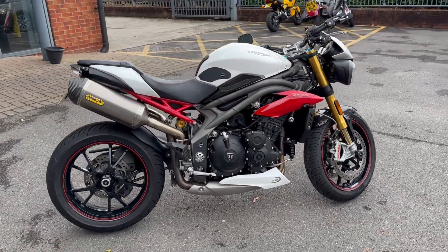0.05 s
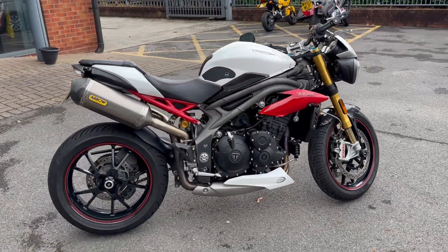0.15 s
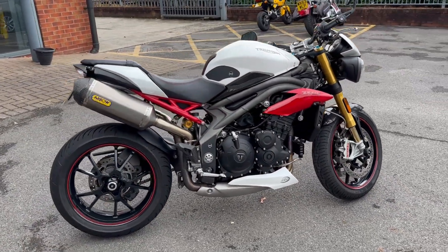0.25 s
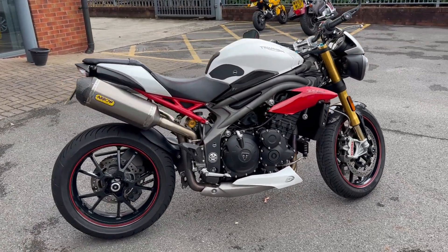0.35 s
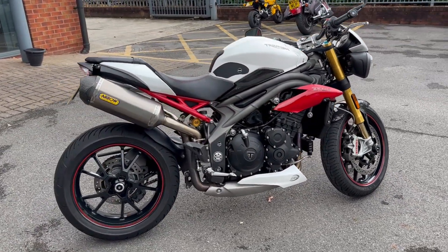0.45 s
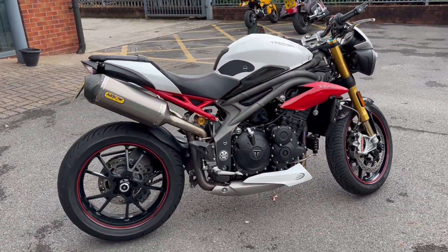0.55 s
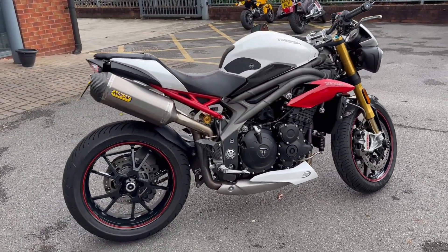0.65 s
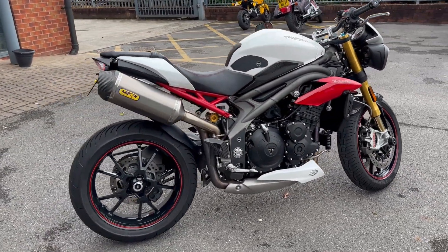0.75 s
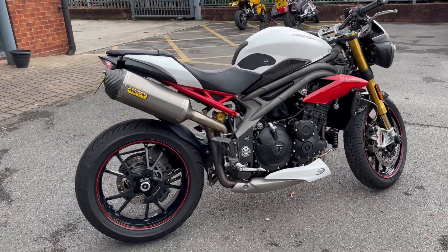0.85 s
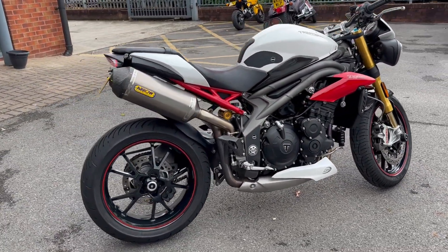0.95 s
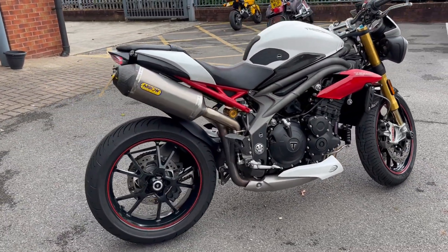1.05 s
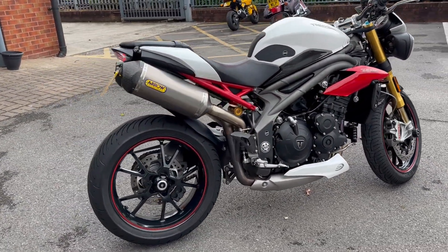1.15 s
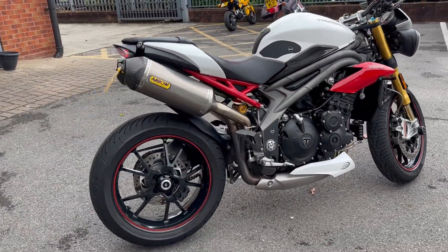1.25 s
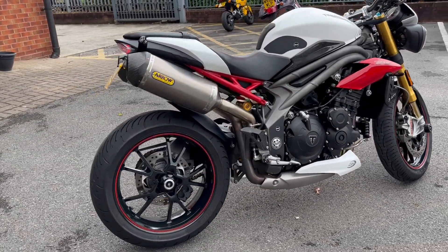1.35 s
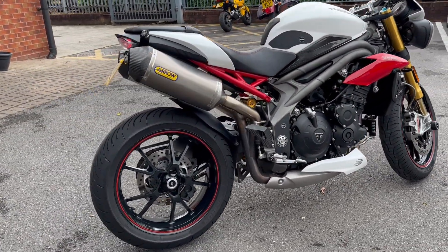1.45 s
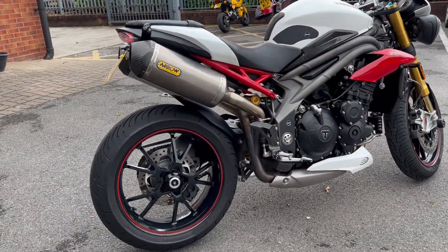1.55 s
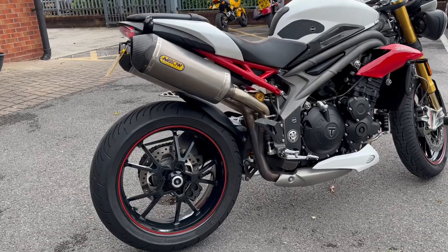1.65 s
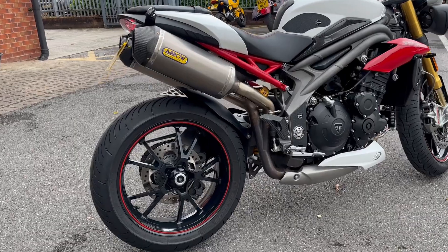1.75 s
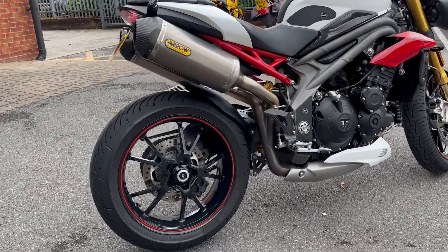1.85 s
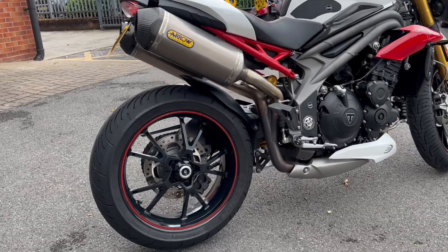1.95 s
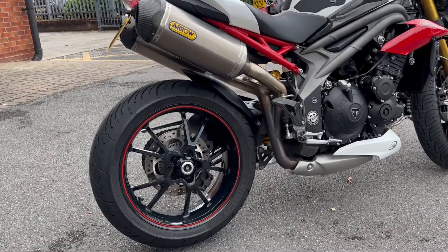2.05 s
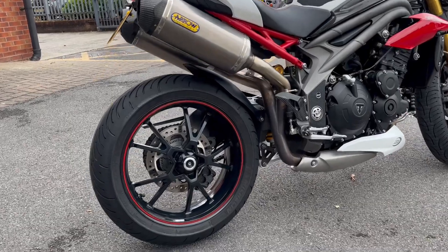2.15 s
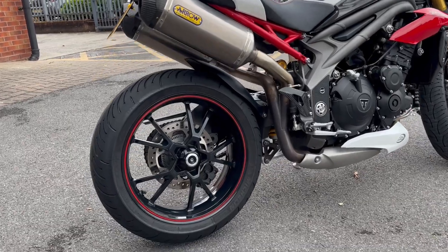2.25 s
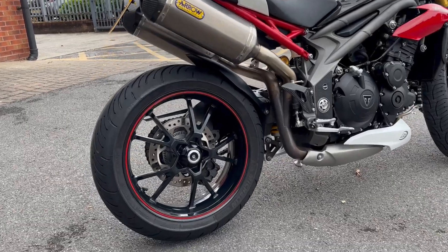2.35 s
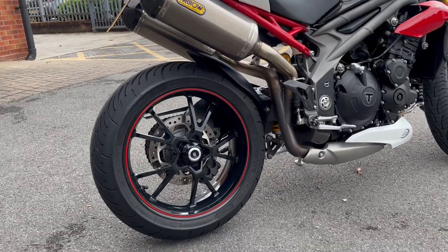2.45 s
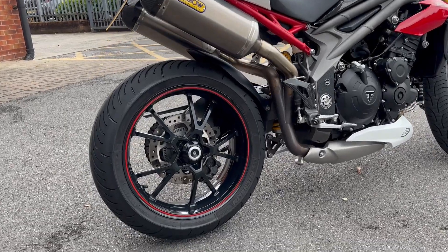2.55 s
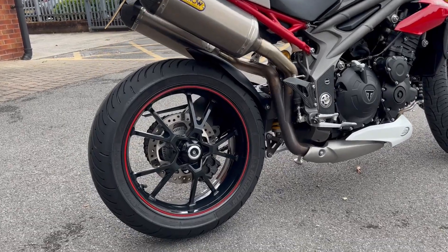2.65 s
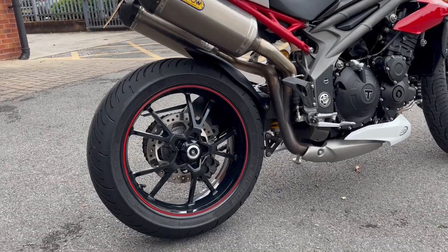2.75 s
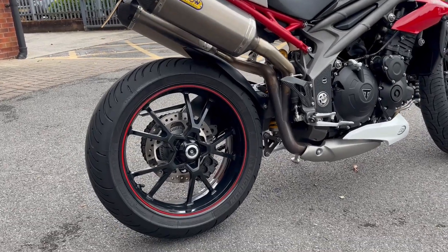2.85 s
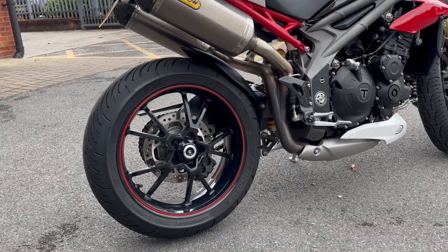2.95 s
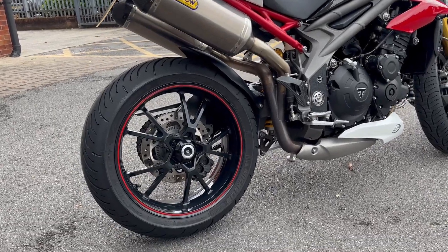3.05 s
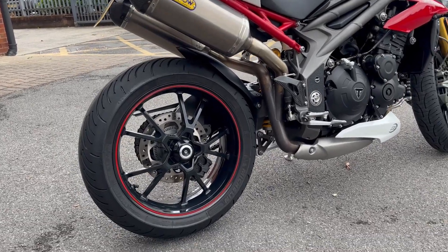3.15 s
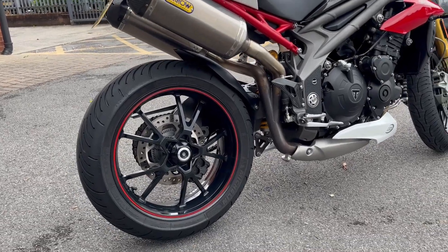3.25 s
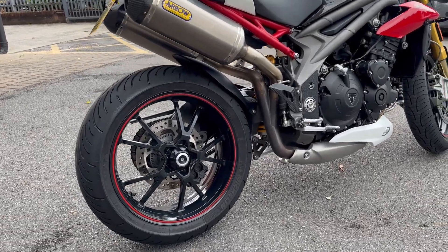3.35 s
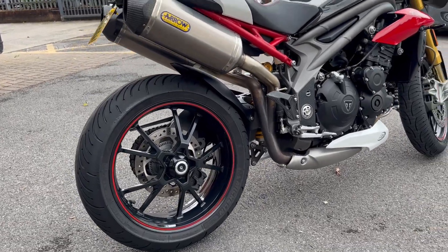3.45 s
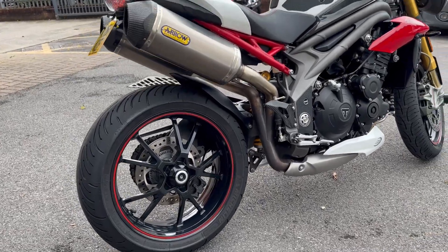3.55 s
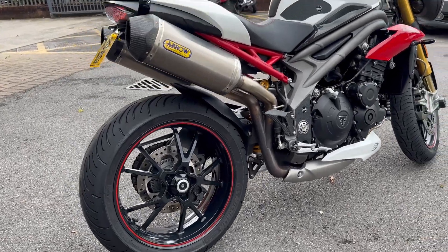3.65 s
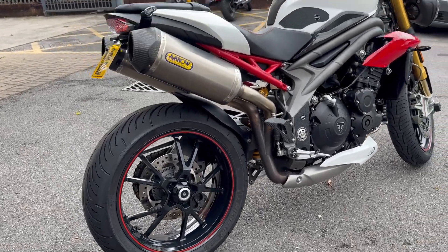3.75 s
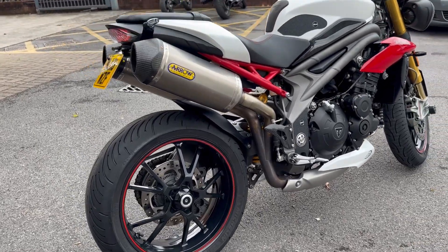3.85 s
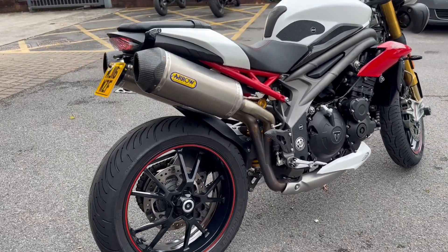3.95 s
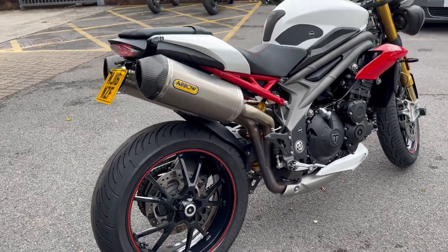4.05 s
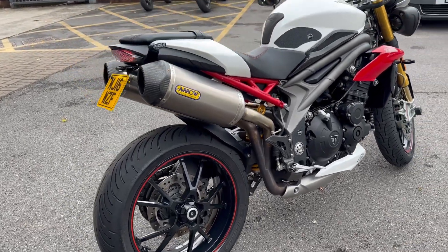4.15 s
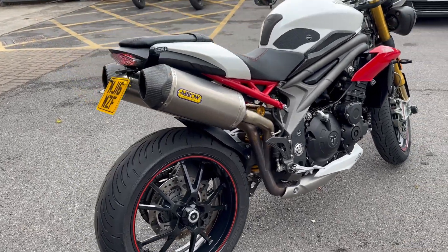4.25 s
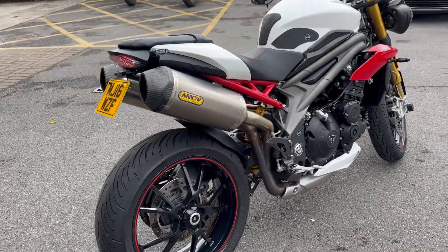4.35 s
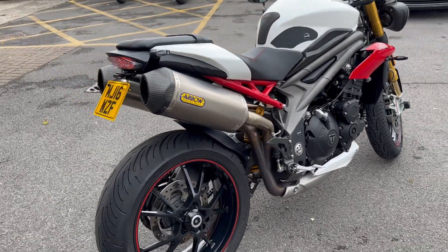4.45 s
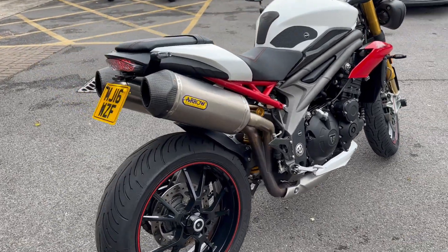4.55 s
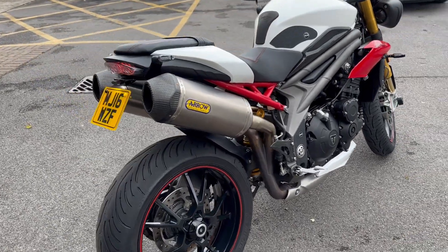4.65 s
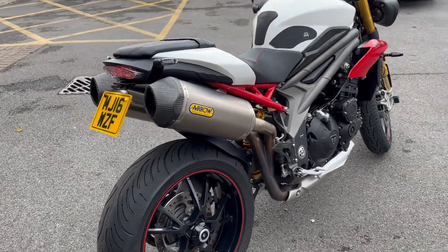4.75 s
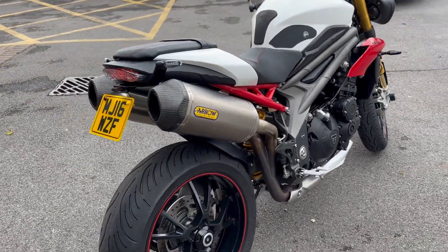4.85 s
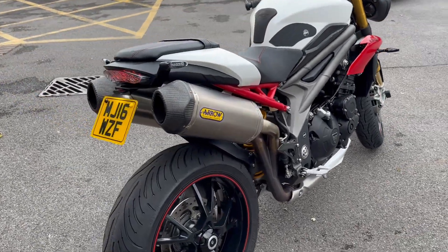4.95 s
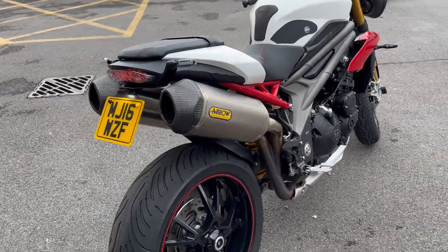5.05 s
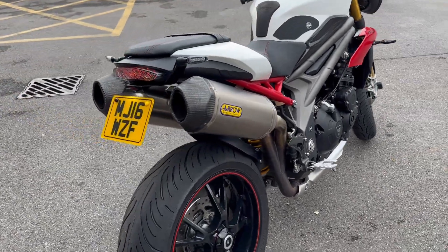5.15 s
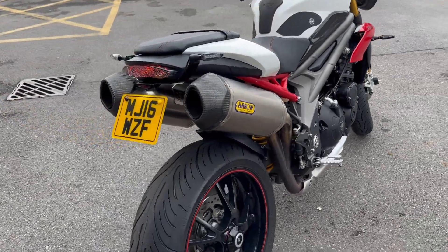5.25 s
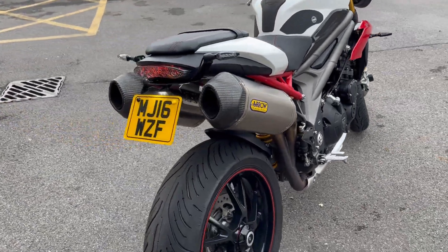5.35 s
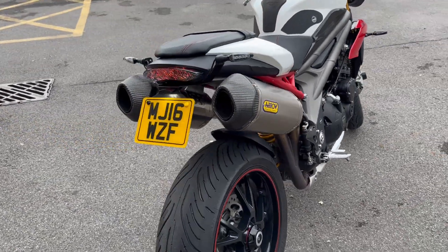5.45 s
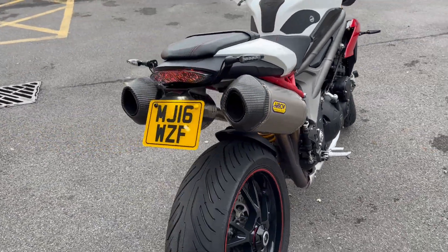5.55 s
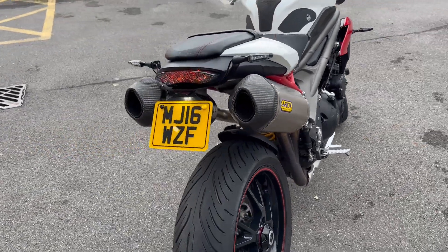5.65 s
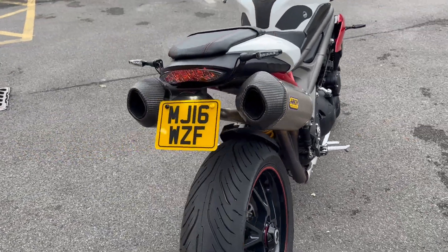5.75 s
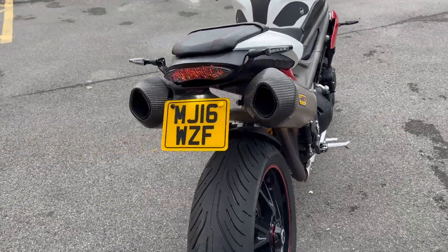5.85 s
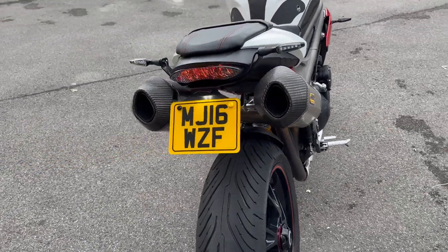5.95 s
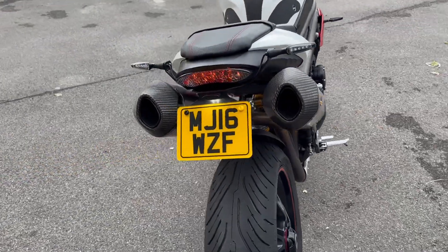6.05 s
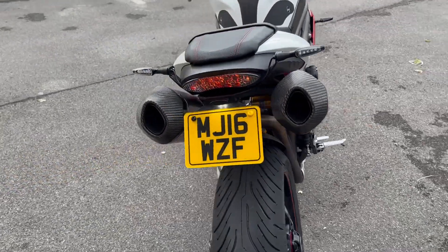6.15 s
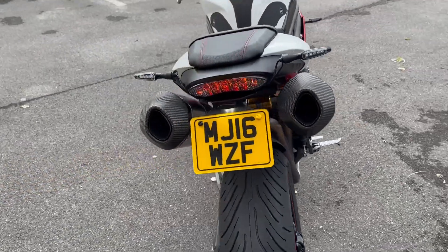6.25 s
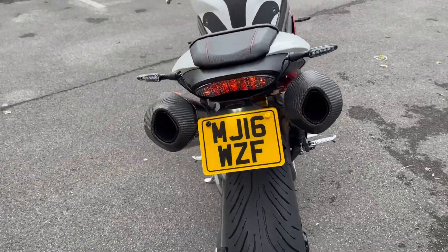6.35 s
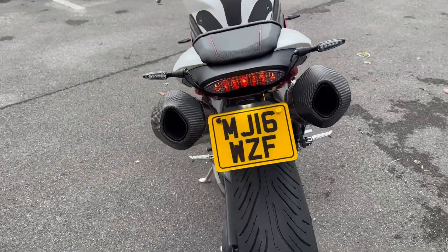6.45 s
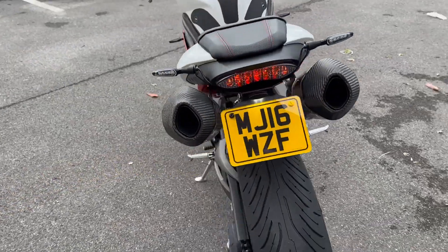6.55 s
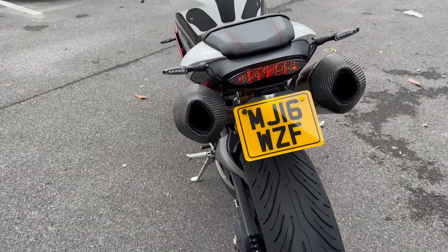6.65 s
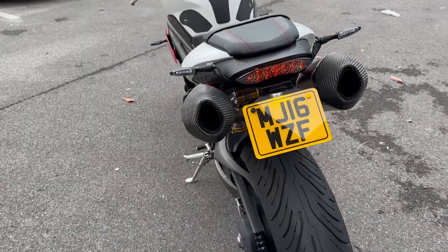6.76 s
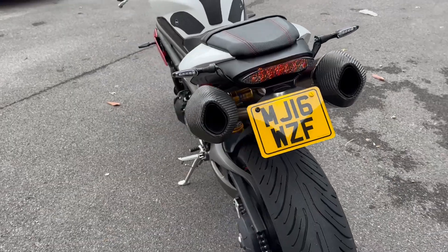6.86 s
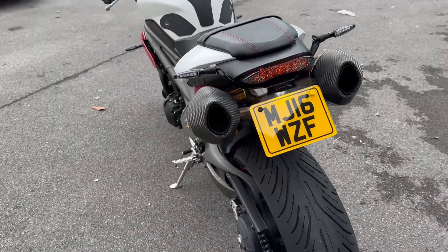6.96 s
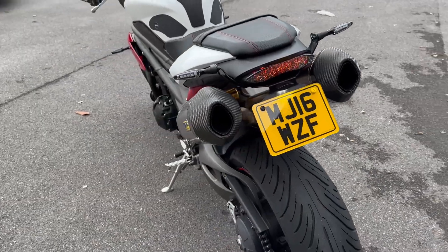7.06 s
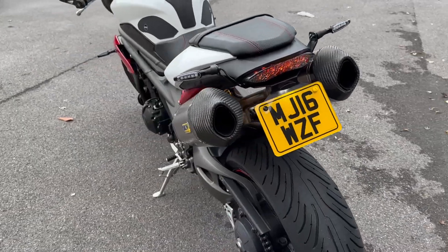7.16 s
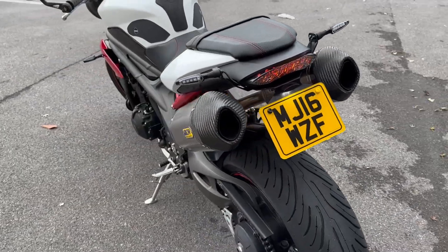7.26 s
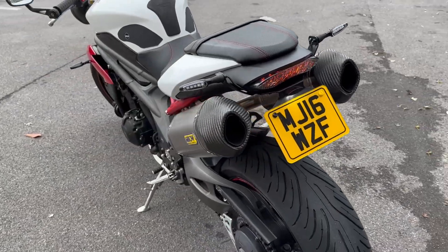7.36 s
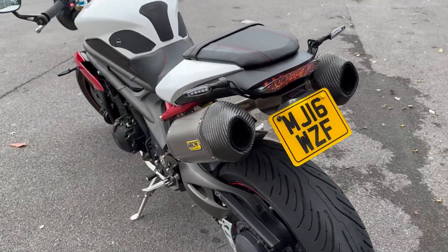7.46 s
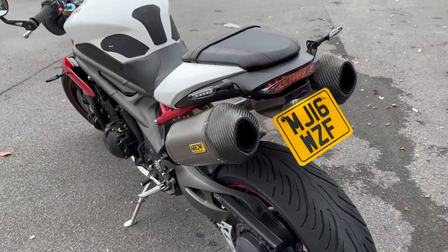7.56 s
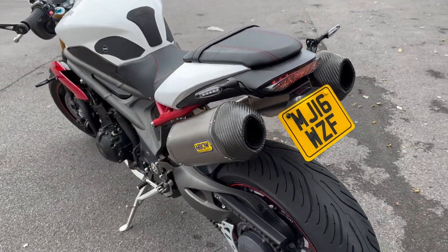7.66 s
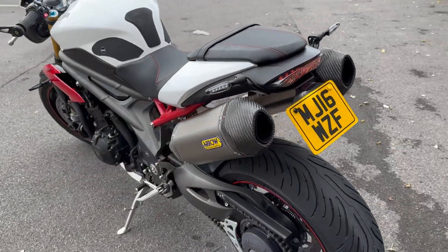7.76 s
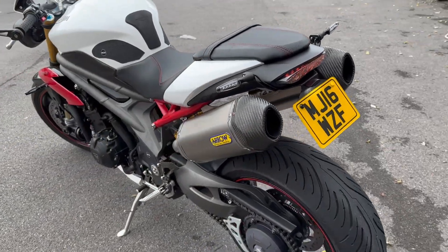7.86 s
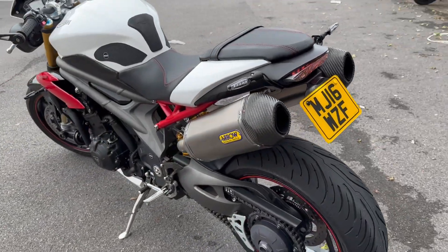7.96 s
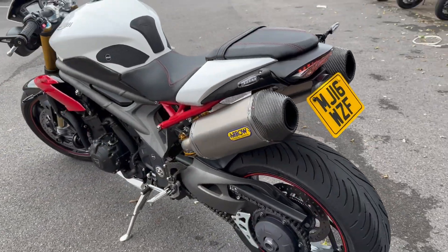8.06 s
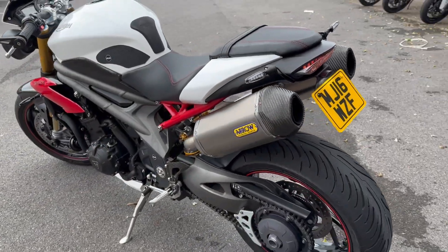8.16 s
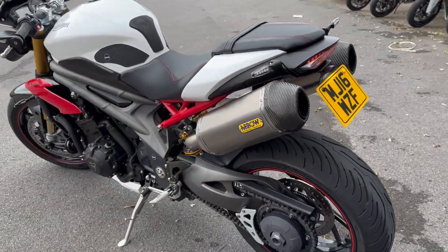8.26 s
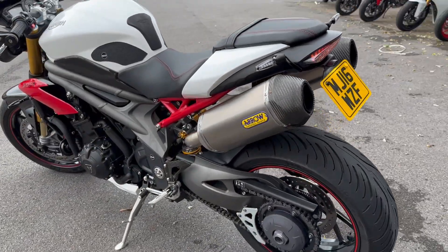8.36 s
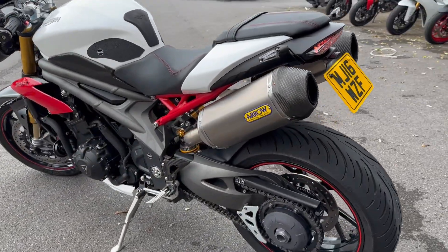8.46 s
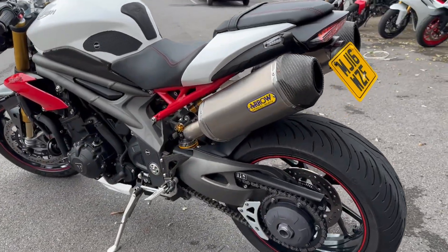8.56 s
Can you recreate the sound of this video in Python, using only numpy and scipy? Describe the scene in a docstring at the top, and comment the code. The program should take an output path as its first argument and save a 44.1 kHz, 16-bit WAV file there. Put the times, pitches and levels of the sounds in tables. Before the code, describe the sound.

A three-cylinder motorcycle idles without revving on an open paved forecourt. A handheld stereo microphone starts a few metres off its right side, hearing a low boom, fast gear chirps, ticking valves and whirring chain. It moves close, then swings behind, where twin tailpipes bark and puff loudest, and ends on the left with the bark easing. Short scattered reflections surround it.

```python
"""A three-cylinder motorcycle idles on an open forecourt; a phone carried along hears its right side first, then its tail, then its left.
On the right the primary gear chirps, as the crank slows and surges with every firing, and injectors and valves tick
over the whirr of the chain. Behind the bike the twin tailpipes beam a bark and puffs of gas; round on the left these ease.
Throughout, every firing rings the exhaust pipes into a boom, and the forecourt returns a short scatter."""
import sys
import numpy as np
from scipy import signal
from scipy.fft import rfft, irfft, next_fast_len
from scipy.io import wavfile
from scipy.ndimage import uniform_filter1d, minimum_filter1d

SR = 44100
rng = np.random.default_rng(int(sys.argv[2]) if len(sys.argv) > 2 else 0)


def transcribe(u):
    """Save the signal u as a 16-bit wav file named by the first command-line argument.

    u: samples, shape (n,) or (channels, n), limited to [-1, 1]; the rate is SR.
    q: integer samples, one column per channel.
    """
    v = np.clip(np.atleast_2d(u).T, -1, 1)
    q = np.round(v * 32767).astype(np.int16)
    wavfile.write(sys.argv[1], SR, q)


N = 379260
TIME = np.arange(N) / SR  # s

# idle speed, wandering with sudden dips: t/s, firing rate/Hz
IDLE_SPEED = [(0.0, 32.74), (0.28, 32.18), (1.14, 33.27), (1.94, 32.3), (2.24, 33.86), (2.35, 31.69),
              (2.93, 33.11), (3.13, 32.04), (3.5, 32.88), (4.11, 32.3), (4.26, 33.58), (4.89, 32.53),
              (5.57, 33.58), (5.77, 30.91), (5.78, 32.73), (7.19, 32.75), (7.31, 30.95), (7.63, 33.58),
              (8.18, 33.19), (8.6, 31.67)]
# walk round the bike: t/s, distance from the tailpipes/m, bearing/degrees (0 behind, 90 on its right)
PHONE_PATH = [(0, 2.53, 79.5), (0.9, 2.15, 77.5), (2.3, 1.02, 84.5), (3.2, 0.86, 83.5), (4.0, 0.93, 61.5),
              (4.5, 0.97, 45), (5.5, 0.77, 29), (6.3, 0.6, 0), (7.1, 0.86, -27.5), (7.7, 0.9, -28.5),
              (8.2, 0.98, -43.5), (8.6, 0.79, -54)]
# cylinders in firing order: boom level/dB, puff level/dB
CYLINDERS = [(-.2, -4), (-.1, -2), (.3, 0)]
# response of headers and silencers: f/Hz, level/dB
PIPE_RESPONSE = [(20, -93), (33, -28), (46, -18), (57, -4.5), (66, 4.5), (98, 2.9), (131, -9), (165, -14.5),
                 (197, -11.5), (230, -11.5), (263, -12), (297, -15), (328, -18.5), (365, -32.5),
                 (480, -50.5)]
# colour of a puff of gas at the tailpipe: f/Hz, level/dB
PUFF_COLOUR = [(200, -18), (400, -9), (510, -3), (600, -7), (730, 2.5), (820, .5), (1000, -12), (1400, -24),
               (4000, -45)]
# gear-mesh harmonics 1-4: loudest place in the firing cycle/0-1, swing/dB, casing mode f/Hz, width/Hz
MESH_HARMONICS = [(0.84, 5, 1166, 370), (0.46, 5, 2697, 280), (0.44, 23, 4132, 68), (0.49, 4, 5180, 310)]
# beams of those harmonics: level at 1 m on the axis/dB, axis bearing/degrees, half width/degrees, loss off the axis/dB
MESH_BEAMS = [(-39, 52.5, 7.7, 6.3), (-43, 34, 10.3, 8.4), (-48.5, 71.5, 9, 7.4), (-58, -62, 54, 6)]
# injectors (first three) and valves: place in the cam turn/0-1, centre f/Hz, width/Hz, decay/s, level before ringing/dB
TICKS = [(.100, 14000, 2200, .002, -9.5), (.425, 14000, 3000, .002, -7), (.780, 14500, 2500, .002, -10),
         (.225, 10500, 7000, .005, -16), (.560, 10500, 7000, .005, -16), (.880, 10500, 7000, .005, -20),
         (.040, 2250, 200, .003, 1), (.375, 3750, 260, .003, -4), (.690, 2450, 220, .003, 1)]
# colour of the chain's whirr: f/Hz, level/dB
WHIRR_COLOUR = [(120, 14.5), (380, 4), (600, 2.5), (900, -7), (1250, -5), (1550, -9), (2700, -17),
                (3000, -15.5), (4100, -13), (4600, -19.5), (6300, -18.5), (8200, -22), (10000, -15.5),
                (15500, -33)]
# ringing of the engine cases: f/Hz, width/Hz, level/dB
CASE_MODES = [(500, 79, -16.5), (691, 79, 1), (1770, 170, -20), (2110, 200, -30)]
# lean between the two microphone ports: f/Hz, left minus right level/dB
PORT_LEAN = [(60, 1), (110, 3), (200, 2.5), (500, 3), (1200, 0.5), (2200, 2), (4400, 9), (8000, 7),
             (14000, -3.5)]
# tilt of the width between the ports, scaled in ports(): f/Hz, relative side level/dB
PORT_WIDTH = [(60, -50), (250, -31), (500, -13), (1000, -5.2), (2000, -4), (4000, -4), (8000, -2),
              (14000, -3)]

CAM_START = .0256  # turns
FIRING_PLACE = .755  # where in each firing cycle the exhaust opens, 0-1
GEAR_TEETH = 60  # on the crank gear
HUNT_FIRINGS, HUNT_HZ = .01, 5  # how far (firings) and how fast the beat drifts as the idle hunts
ENGINE_AHEAD_M = 0.88  # from the tailpipes to the engine
BOOM_DB = -13  # at 1 m
RASP_DB = -11.25  # against the mean of boom and bark in dB

# beams: level at 1 m on the axis/dB, axis bearing/degrees, half width/degrees, loss off the axis/dB
BARK_BEAM = (-20.0, 3.5, 67.5, 28)
PUFF_BEAM = (-40.7, -11, 24, 16)
WHIRR_BEAM = (-27.5, 19, 39, 4.5)
CLATTER_BEAM = (-43.5, 42.5, 51, 3.5)
SIZZLE_BEAM = (-52.5, 65, 46, -0.5)
CLUTCH_BEAM = (-49, 73, 58, 20)
LEFT_COVER_BEAM = (-48.5, -61, 28, 14)

# the tail of the bike hides the engine from behind: where, and how much it takes away
SHADE_BEARING_DEG, SHADE_WIDTH_DEG = -8.5, 22.4
SHADE_CLATTER_DB, SHADE_SIZZLE_DB, SHADE_GEAR_DB = 3, 7, 5.5
LIMIT_DB, LIMIT_S = -1.0, .06  # limiter ceiling and response time
TOP_HZ = 15750  # where the treble is cut


def undb(db):
    """Decibels to gain."""
    return 10 ** (np.asarray(db) / 20)


def unit(x):
    """Scale to rms 1."""
    return x / np.sqrt(np.mean(x ** 2))


def curves(table):
    """One value per sample for each column after the time column."""
    s, *columns = np.transpose(table)
    return [np.interp(TIME, s, column) for column in columns]


def gains(points, hz):
    """Gain at these frequencies, drawn between points on a log frequency scale."""
    f, db = np.transpose(points)
    return undb(np.interp(np.log(np.maximum(hz, 1)), np.log(f), db))


def shape(x, response):
    """Filter by a response given as a function of frequency."""
    size = next_fast_len(N + SR, real=True)
    f = np.arange(size // 2 + 1) * SR / size + 1e-9
    return irfft(rfft(x, size) * response(f), size)[..., :N]


def causal(gain):
    """The minimum-phase response with this gain: it rings only after its cause."""
    cepstrum = irfft(np.log(gain + 1e-9))
    half = len(cepstrum) // 2
    folded = np.r_[cepstrum[0], 2 * cepstrum[1:half], np.zeros(half)]
    return np.exp(rfft(folded))


def resonance(f, hz, width):
    """Response of one mode, gain 1 at its centre."""
    return 1 / (1 + 1j * (f / hz - hz / f) * hz / width)


def split(x, hz, order=16):
    """The parts below and above a frequency."""
    low = shape(x, lambda f: 1 / (1 + (f / hz) ** order))
    return low, x - low


def walk(rate):
    """Smooth random drift with rms 1; rate in Hz sets its speed."""
    return unit(shape(rng.standard_normal(N), lambda f: np.exp(-(f / rate) ** 2)))


def passes(phase):
    """Times at which a rising phase passes a whole number, and those numbers."""
    turns = np.arange(np.ceil(phase[0]), phase[-1])
    return np.interp(turns, phase, TIME), turns.astype(int)


def pulses(times, sizes):
    """One single-sample pulse at each time."""
    return np.bincount(np.clip(times * SR, 0, N - 1).astype(int), sizes, N)


def bursts(train, decay):
    """Noise that jumps up at each pulse and dies away."""
    envelope = signal.lfilter([1], [1, -np.exp(-1 / (decay * SR))], train)
    return envelope * rng.standard_normal(N)


def off_axis(bearing, axis_deg, width_deg):
    """0 on a beam's axis, a half at its half width, rising smoothly to 1 well outside."""
    return 1 - 1 / (1 + ((bearing - axis_deg) / width_deg) ** 4)


def heard(beam, metres, bearing):
    """Level in dB of a beamed source from this distance and bearing."""
    db, axis_deg, width_deg, loss_db = beam
    return db - 20 * np.log10(metres) - loss_db * off_axis(bearing, axis_deg, width_deg)


def exhaust(cam, boom_db, bark_db, puff_db):
    """Slightly uneven firings ring the pipes; the harder ones spit more gas."""
    times, turn = passes(len(CYLINDERS) * cam - FIRING_PLACE)
    cylinder_db, spit_db = np.array(CYLINDERS)[turn % len(CYLINDERS)].T
    force, jitter, spit = rng.standard_normal((len(times), 3)).T
    times = times + 0.00019 * jitter
    firings = pulses(times, undb(cylinder_db + .5 * force))
    pipes = shape(firings, lambda f: causal(gains(PIPE_RESPONSE, f) / (1 + (f / 560) ** 6)))
    # the silencer chamber stores the middle of each pulse and lets it out late, so the beats run together
    pipes = shape(pipes, lambda f: 1 - 2 * resonance(f, hz=226.5, width=55))
    boom, front = split(pipes, 147)
    bark, rasp = split(front, 223.0)
    # off their axis the two tailpipes partly cancel, so the bark wavers there
    bark = bark * undb(0.15 * (bark_db.max() - bark_db) * walk(4.8))
    # the rasp also leaves through the silencer walls, so it is less beamed than the bark
    rasp_db = .5 * (bark_db + boom_db) + RASP_DB
    spits = pulses(times, undb(spit_db + .55 * (force + spit)))
    gas = unit(spits) + .13 * unit(bursts(spits, decay=.003))
    puff = unit(shape(gas, lambda f: causal(gains(PUFF_COLOUR, f))))
    tone = unit(boom) * undb(boom_db) + unit(bark) * undb(bark_db) + unit(rasp) * undb(rasp_db)
    return tone + puff * undb(puff_db)


def primary_gear(cam, firing_hz, mesh_db, ripple=0.055, flutter=0.015):
    """Teeth mesh at the crank's own speed, which sags on compression and surges on each firing: a train of chirps."""
    stroke = len(CYLINDERS) * cam
    surge = ripple * undb(1.7 * walk(13.9)) * np.cos(2 * np.pi * (stroke - .66))
    speed = 1 + surge + flutter * walk(305.7)
    crank_hz = 2 * firing_hz / len(CYLINDERS) * speed  # two crank turns per cam turn
    angle = 2 * np.pi * GEAR_TEETH * np.cumsum(crank_hz) / SR
    out = 0
    for k, ((place, swing_db, hz, width), db) in enumerate(zip(MESH_HARMONICS, mesh_db), 1):
        swell_db = swing_db * np.cos(2 * np.pi * (stroke - place)) + 2.6 * walk(70)
        tone = np.sin(k * angle) * undb(swell_db)
        # the casing sings out as the sweep crosses one of its modes
        ringing = signal.lfilter(*signal.iirpeak(hz, hz / width, fs=SR), tone)
        out = out + unit(ringing) * undb(db)
    return out


def valve_train(cam):
    """Every injector and valve strikes once a cam turn and rings its own part of the head."""
    out = 0
    for place, hz, width, decay, db in TICKS:
        times, _ = passes(cam - place)
        force, jitter = rng.standard_normal((len(times), 2)).T
        strikes = bursts(pulses(times + 0.0002 * jitter, undb(db + 1.6 * force)), decay)
        out = out + signal.lfilter(*signal.iirpeak(hz, hz / width, fs=SR), strikes)
    return out


def chain(cam, grain_db=2.0, throb_db=0.1):
    """Dense link contacts, very lightly loaded by each firing, ring the cases."""
    load_db = throb_db * np.cos(2 * np.pi * (len(CYLINDERS) * cam - .7)) + 1.3 * walk(90)
    contacts = rng.standard_normal(N) * undb(load_db + grain_db * walk(1900))

    def cases(f):
        """Sum of the case modes."""
        return sum(undb(db) * resonance(f, hz, width) for hz, width, db in CASE_MODES)

    return shape(contacts, lambda f: causal(gains(WHIRR_COLOUR, f)) + cases(f))


def block(cam, whirr_db, clatter_db, sizzle_db):
    """Chain and valve noise radiates in three bands: low whirr, clatter and sizzle."""
    whirr, high = split(chain(cam) + valve_train(cam), 1690, order=8)
    clatter, sizzle = split(high, 4370, order=8)
    return unit(whirr) * undb(whirr_db) + unit(clatter) * undb(clatter_db) + unit(sizzle) * undb(sizzle_db)


def side_cover(cam, cover_db, hz, width, swing_db=3):
    """Each firing rattles the gears, which ring a side cover of the engine."""
    rattle_db = swing_db * np.cos(2 * np.pi * (len(CYLINDERS) * cam - .75))
    rattle = rng.standard_normal(N) * undb(rattle_db)
    return unit(shape(rattle, lambda f: resonance(f, hz, width) ** 2)) * undb(cover_db)


def engine(cam, firing_hz, metres, bearing):
    """Block, gear and side covers as heard from one place; the tail shades the clatter, sizzle and gear."""
    shade = 1 - off_axis(bearing, SHADE_BEARING_DEG, SHADE_WIDTH_DEG)

    def level(beam, shade_db=0):
        """Level in dB after distance, beam and shade."""
        return heard(beam, metres, bearing) - shade_db * shade

    return (block(cam, level(WHIRR_BEAM), level(CLATTER_BEAM, SHADE_CLATTER_DB), level(SIZZLE_BEAM, SHADE_SIZZLE_DB))
            + primary_gear(cam, firing_hz, [level(beam, SHADE_GEAR_DB) for beam in MESH_BEAMS])
            + side_cover(cam, level(CLUTCH_BEAM), hz=1040, width=100)
            + side_cover(cam, level(LEFT_COVER_BEAM), hz=1130, width=230))


def forecourt(x, t60=0.093):
    """Scattered returns from ground and walls, unrelated left and right, without the low boom."""
    t = TIME[:SR // 2]
    decay = np.exp(-np.log(1000) * t / t60)
    tail = rng.standard_normal((2, len(t))) * decay * (t > .004)
    tail /= np.sqrt(np.sum(tail ** 2, axis=1, keepdims=True))
    _, upper = split(x, 310, order=6)
    return signal.fftconvolve(upper[None], tail, axes=1)[:, :N]


def ports(x, second_draw):
    """Two close ports differ by the direct sound a quarter cycle out of step, a loose second draw, and a lean."""
    direct_side = shape(x, lambda f: .55j * gains(PORT_WIDTH, f))
    loose_side = .72 * shape(second_draw, lambda f: gains(PORT_WIDTH, f))
    lean = shape(x, lambda f: (gains(PORT_LEAN, f) - 1) / (gains(PORT_LEAN, f) + 1))
    return x + (direct_side + loose_side + lean) * np.array([[1], [-1]])


def scene():
    """The cam turns once for every three firings and times the engine's sounds; the phone's place sets their levels."""
    firings = np.cumsum(curves(IDLE_SPEED)[0]) / SR + HUNT_FIRINGS * walk(HUNT_HZ)
    firing_hz = np.gradient(firings) * SR
    cam = CAM_START + firings / len(CYLINDERS)
    metres, bearing = curves(PHONE_PATH)
    engine_metres = np.hypot(metres, ENGINE_AHEAD_M)
    # a second random draw of the same engine noise widens the stereo
    first_draw, second_draw = (engine(cam, firing_hz, engine_metres, bearing) for _ in range(2))
    boom_db = BOOM_DB - 20 * np.log10(metres)  # the boom spreads evenly all round
    bark_db, puff_db = (heard(beam, metres, bearing) for beam in (BARK_BEAM, PUFF_BEAM))
    bike = exhaust(cam, boom_db, bark_db, puff_db) + first_draw
    return ports(bike, second_draw) + undb(-12) * forecourt(bike)


def record(dry):
    """The phone's limiter eases the highest peaks down; then the top is cut."""
    size = int(LIMIT_S * SR)
    needed = np.minimum(1, undb(LIMIT_DB) / (np.abs(dry).max(axis=0) + 1e-9))
    gain = uniform_filter1d(minimum_filter1d(needed, size), size)
    top_cut = signal.ellip(10, .2, 80, TOP_HZ, fs=SR, output="sos")
    return signal.sosfilt(top_cut, dry * gain)


dry = scene()
out = record(dry)
transcribe(out)
```